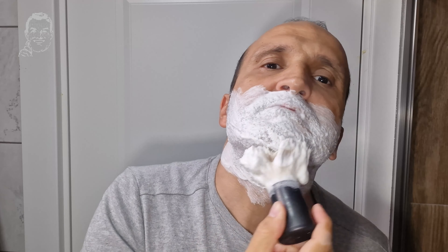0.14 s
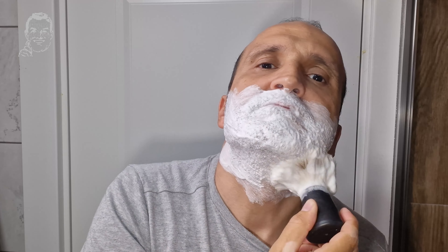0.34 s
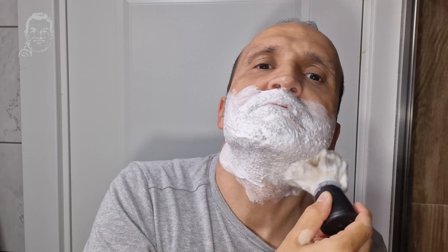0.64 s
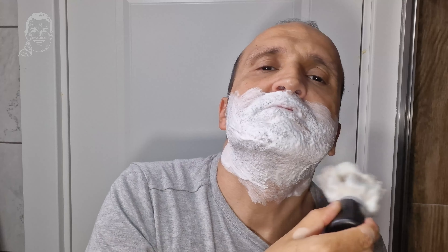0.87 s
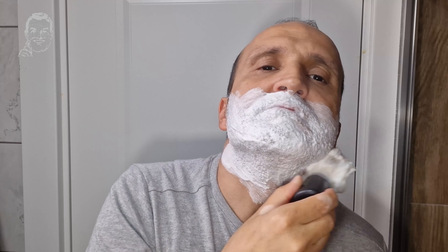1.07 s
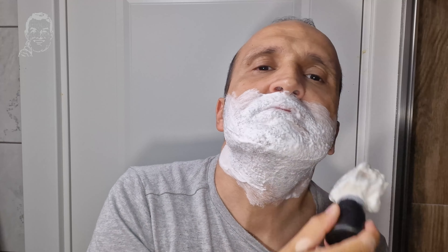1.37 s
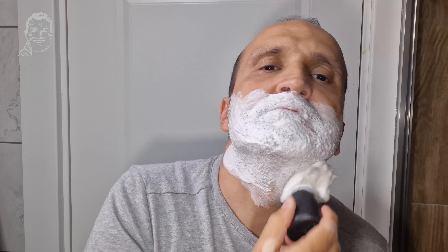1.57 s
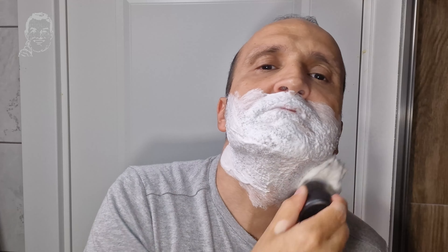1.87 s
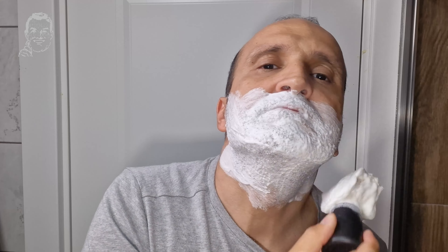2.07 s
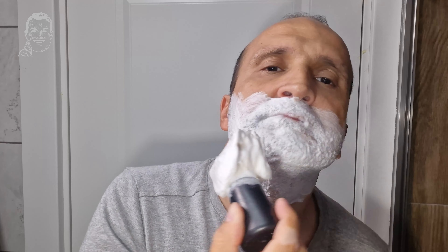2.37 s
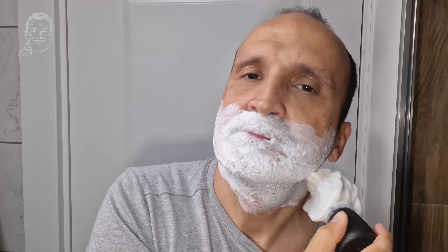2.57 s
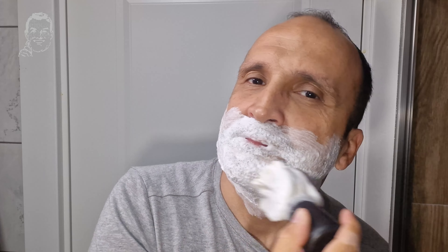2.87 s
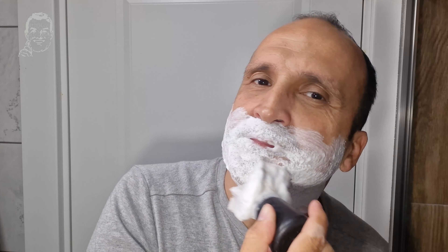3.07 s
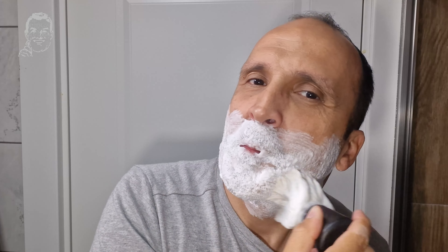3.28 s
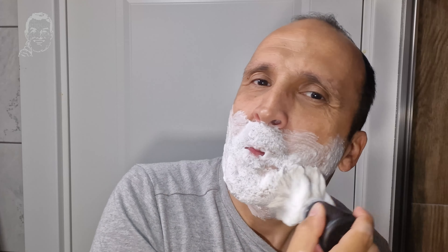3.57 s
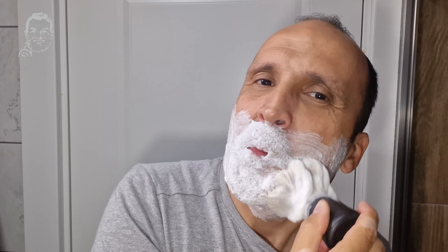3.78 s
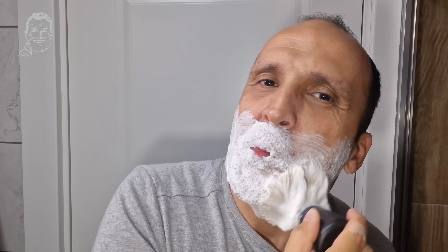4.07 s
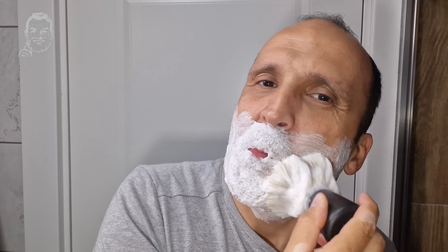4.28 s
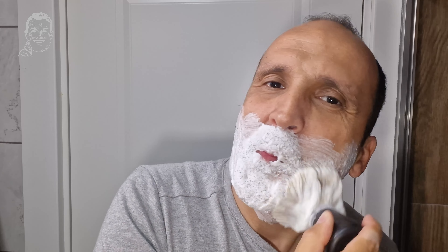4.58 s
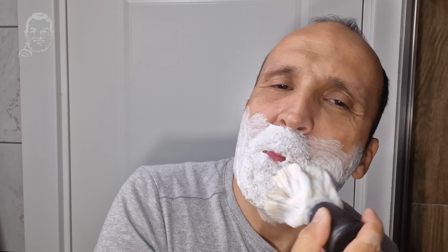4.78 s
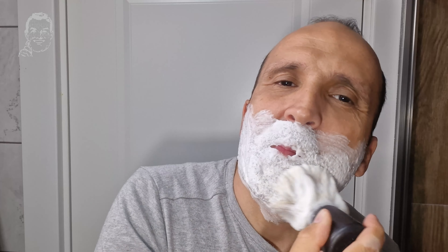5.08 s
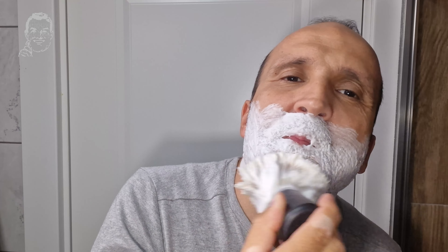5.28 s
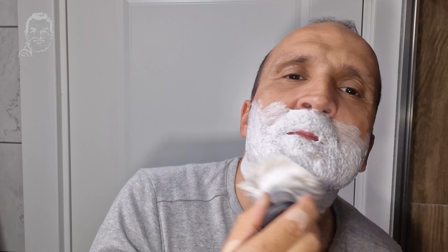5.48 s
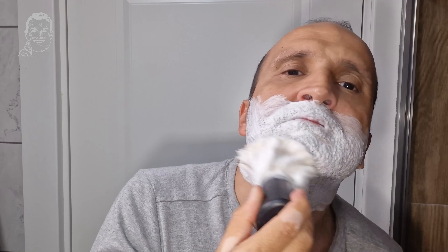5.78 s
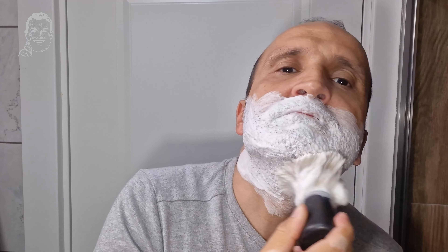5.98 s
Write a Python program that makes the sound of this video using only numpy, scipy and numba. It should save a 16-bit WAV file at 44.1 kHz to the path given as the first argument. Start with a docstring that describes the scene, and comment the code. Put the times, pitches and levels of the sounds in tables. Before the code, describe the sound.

Close up in a small bathroom, a wet shaving brush sweeps hard over a lathered, stubbly face, about seven strokes a second, each a bristly swish with a raspy edge. After one second it nearly stops, leaving faint dabs and soft low plops over quiet hiss. From about 2.4 seconds it sweeps again, a little softer, with fizzing foam, small squelches and popping bubbles until the end.

```python
"""Over a faint room hiss, a wet brush sweeps hard to and fro on a lathered face: bristles flick in dense clicks that
merge into a swish, with shaft rasp, cheek resonance, foam fizz and tip scratch shaped by the same strokes.
Squelches ring as narrow bands in the knot, and single bubbles snap as ticks of a few cycles. From about 1 to 2.4 s
the brush only dabs the neck, with soft plops that ring low and rise; then it sweeps again, more softly, and fizz
comes forward. Early echoes mottle the brush, and narrow resonances and a short tail put it in a small bathroom."""
import sys
import numpy as np
from scipy import signal
from scipy.fft import rfft, irfft
from scipy.io import wavfile
from scipy.ndimage import uniform_filter1d
from numba import njit

SR = 44100
rng = np.random.default_rng(int(sys.argv[2]) if len(sys.argv) > 2 else 0)


def pcm_store(signal):
    """Save signal as 16-bit PCM."""
    levels = np.round(np.clip(np.atleast_2d(signal), -1, 1) * 32767)
    wavfile.write(sys.argv[1], SR, levels.astype(np.int16).T)


N = 270774
T = np.arange(N) / SR  # time of each sample [s]

# colour of the steady room noise: (frequency [Hz], level [dB])
ROOM_COLOUR = [(15, -54), (25, -14), (59, -7), (125, -6.5), (335, -1.5), (811, -1.5), (1060, -4.5),
               (3540, -10), (5880, -7), (7480, -8), (8100, -9.5), (9520, -10.5), (10300, -8), (15000, -8)]
ROOM_DB = -71.5

# strokes of the brush: (fastest moment [s], rise [s], fall [s], swish [dB], then relative to the swish:
# cheek [dB], shaft rasp [dB], foam fizz [dB], tip scratch [dB]; then
# resonance of the wet knot [Hz], lag of foam and tips behind the bristles [s])
BRUSH_STROKES = [(0.06, 0.089, 0.056, -34.5, -11, -8, -9, -7, 3740, 0.00012),
                 (0.203, 0.1, 0.044, -41, -13, -5.5, -11, -15, 3460, 0.018),
                 (0.337, 0.081, 0.062, -33, -12, -6.5, -15.5, -8, 4200, 0.0038),
                 (0.468, 0.055, 0.068, -43.5, -18, -6, -16.0, -19, 3930, -0.00092),
                 (0.59, 0.073, 0.074, -36, -10, -5, -7.5, -13, 4060.0, 0.0075),
                 (0.754, 0.08, 0.059, -49, -20, -8, -13.5, -20, 4630, -0.0013),
                 (0.865, 0.09, 0.047, -42.0, -13.5, -9.5, -7, -26, 4400, 0.001),
                 (0.92, 0.08, 0.039, -44, -15.5, -5, -8, -27, 4600, -0.0027),
                 (1.164, 0.1, 0.16, -63, -14, -12, -14, -15, 4630, -0.002),
                 (1.323, 0.1, 0.052, -67.5, -7.5, -4, -13, -9.0, 3780.0, -0.014),
                 (1.572, 0.022, 0.032, -62.0, -3.5, 0, -19, -6.5, 3830.0, -0.0011),
                 (1.634, 0.097, 0.073, -68, -9.5, -4.5, -9.5, -9.0, 4030, 0.019),
                 (1.724, 0.078, 0.043, -57, -15.5, -7.5, -13.5, -16, 3430, -0.003),
                 (2.03, 0.18, 0.041, -69.5, -14, -8, -13, -8, 4350, -0.016),
                 (2.073, 0.06, 0.034, -56, -16.5, -6.5, -14.5, -17, 3950, 0.003),
                 (2.271, 0.055, 0.15, -74.5, -1.5, -9.5, -18, -6, 4180.0, 0.0081),
                 (2.389, 0.047, 0.028, -47, -15.5, -8, -9.5, -19, 3800, 0.0082),
                 (2.612, 0.057, 0.063, -37, -12.5, -10, -12.5, -11, 3730, -0.0033),
                 (2.859, 0.11, 0.055, -57, -10.5, -10.5, -6, -22, 3400, 0.003),
                 (2.996, 0.061, 0.053, -36, -13.5, -11.5, -3, -21, 3800, -0.0034),
                 (3.114, 0.022, 0.089, -48.5, -16, -10.5, -9, -21.5, 3020.0, 0.025),
                 (3.16, 0.084, 0.043, -52.5, -14.5, -6, -4, -18.0, 4060.0, 0.003),
                 (3.301, 0.066, 0.057, -38, -13.5, -8.5, -1.5, -20, 4100, -0.0033),
                 (3.443, 0.07, 0.042, -50, -14, -7.5, -6.5, -27, 3140.0, 0.011),
                 (3.562, 0.068, 0.071, -39.5, -13.5, -9.5, -3, -19, 4460, -0.00081),
                 (3.69, 0.065, 0.074, -52.5, -18.5, -18.5, -5.5, -22.0, 3760, 0.005),
                 (3.735, 0.049, 0.043, -47.0, -10, -4.5, -8.5, -20.0, 3010.0, -0.0029),
                 (3.855, 0.074, 0.15, -45.5, -11.5, -8, -4, -20.0, 3880, -0.0081),
                 (3.992, 0.068, 0.072, -46, -9.5, -5.5, -2.5, -28, 3260.0, -0.0014),
                 (4.091, 0.037, 0.049, -47, -7.5, -12.5, 3.5, -14.5, 4930, 0.0012),
                 (4.165, 0.14, 0.12, -52.5, -14, -13, -3.5, -28, 4070, -0.00098),
                 (4.248, 0.032, 0.074, -46.5, -9, -1.5, -8.5, -22.0, 3670, 0.0099),
                 (4.359, 0.054, 0.063, -52.5, -6, -12, 4.5, -15, 4730, 0.0053),
                 (4.415, 0.048, 0.054, -63, -19, -8, 2, -22, 4220, 0),
                 (4.473, 0.047, 0.03, -45, -16.5, -22, -4.5, -25, 4050, -0.0083),
                 (4.519, 0.064, 0.053, -49.5, -11.5, -5, -5, -21, 2960, 0.0041),
                 (4.621, 0.051, 0.097, -55.5, -2, -8.5, 7.5, -10, 3990.0, -0.00056),
                 (4.713, 0.049, 0.074, -49.5, -18, -10, -4, -17, 3360, -0.02),
                 (4.783, 0.065, 0.056, -49.5, -10, -6, -7, -20, 3060.0, 0.017),
                 (4.927, 0.083, 0.041, -46.5, -4.5, -10.5, 4, -7, 3520, -0.0068),
                 (5.049, 0.14, 0.077, -52.5, -13, -10.5, -7, -18, 2780.0, 0.0081),
                 (5.188, 0.047, 0.036, -48.5, -10, -8, -4, -15, 3420, -0.0017),
                 (5.269, 0.19, 0.069, -60.5, -10.5, -7.5, -12.0, -12.0, 2790.0, 0.014),
                 (5.32, 0.061, 0.072, -56.5, -9.5, -10, -10, -12, 2960, 0.005),
                 (5.469, 0.072, 0.027, -42, -10.5, -7, -3.5, -10.5, 5170, -0.003),
                 (5.561, 0.1, 0.14, -59, -8, -7.5, -9, -9, 2780, 0.0091),
                 (5.773, 0.099, 0.038, -50.0, -14.5, -11.5, -2, -4.0, 4670, 0.0029),
                 (5.861, 0.087, 0.088, -61.5, -6, -5, -10, -7, 4070, 0.012),
                 (6.05, 0.094, 0.064, -47.5, -12, -11, -5, -5, 5030, 0.00081),
                 (6.093, 0.027, 0.058, -55, -1, -9, -3.5, -19, 4110.0, -0.006)]
ARCH_DB = 21.5  # drop of each stroke's rounded arch after its rise or fall time
ARCH_POWER, ARCH_FOOT = 2.473, 4  # higher: a flatter top; a foot that ends sooner
KNOT_SAG_PER_S = 0.56  # the knot's resonance sinks through a stroke as the bristles splay
REST_DB = -86  # the brush merely lying in the lather

# colours of the flicks, shaft rasp, skin, foam and tips: (frequency [Hz], level [dB])
SWISH_COLOUR = [(600, -56), (1300, -34), (2100, -2.5), (2700, -1.5), (3700, 0.5), (4600, 1.5), (5000, -1),
                (5400, -9), (6200, -10.5), (6800, -22), (9000, -35), (15000, -55)]
SHAFT_COLOUR = [(100, -67.5), (600, -33.5), (1150, -16.5), (1480, -4.5), (1800, -0.5), (2150, -1.5),
                (2600, -5), (3500, -33.5), (8000, -49.5)]
CHEEK_COLOUR = [(50, -49), (130, -55), (250, -30), (340, -20), (420, -10), (520, -1.5), (680, 4.5),
                (790, -2), (1000, 4), (1300, 2.5), (1700, 0.5), (3000, -50)]
FIZZ_COLOUR = [(300, -59), (5000, -27), (5700, -8.5), (6200, 6), (6800, 0.5), (7400, 3.5), (8000, 7),
               (8600, 4.5), (9400, 0.5), (10400, -2.5), (12000, -12), (15000, -23.5)]
TIP_COLOUR = [(300, -62), (3000, -37.5), (5400, -3.5), (6200, 0.5), (7500, -1.5), (9500, 0.5), (11000, -6),
              (12600, -4), (13700, -14.5), (15500, -19)]

# cheek resonance, set by where the brush lies over the hollow of the mouth: (time [s], frequency [Hz])
CHEEK_HOLLOW = [(0, 945), (.2, 900), (.58, 1075), (.9, 910), (2.0, 776), (2.39, 1170), (2.56, 710),
                (2.66, 864), (2.95, 1076), (3.45, 890), (3.75, 997), (4.5, 972), (4.95, 1060), (5.19, 736),
                (5.45, 1180), (5.75, 1040), (6.14, 740)]
# foam resonance, dipping to about 6.4 kHz in the last strokes before the neck dabs: (time [s], frequency [Hz])
FOAM_PITCH = [(0, 8100), (.24, 8100), (.406, 7300), (.548, 7360), (.676, 6400), (.912, 6370), (1.28, 8050),
              (4.7, 8080), (5.25, 7860), (5.75, 8470)]
FOAM_WANDER = 0.011  # share by which the foam resonance drifts

# squeezed knot ringing in a narrow band: (middle [s], spread of the swell [s], pitch at the middle [Hz],
# level before the swell [dB])
KNOT_SQUELCHES = [(0.197, 0.02, 1780, -48), (1.397, 0.045, 1400, -76.5), (2.066, 0.02, 644, -71.5),
                  (2.592, 0.017, 644, -50), (2.627, 0.02, 800, -55.5), (2.613, 0.0071, 1490, -46),
                  (2.831, 0.03, 3660, -58), (2.996, 0.032, 1185, -52.5), (4.22, .03, 3940, -52.5),
                  (4.41, .025, 4220, -56.5), (4.493, 0.01, 2950, -50), (4.504, 0.014, 1830, -61),
                  (4.665, 0.035, 4000, -56), (3.303, .025, 432, -74), (4.929, 0.015, 394, -66),
                  (5.033, 0.017, 2540, -53), (5.28, 0.052, 2780, -62), (5.324, 0.0091, 4700, -52),
                  (5.462, 0.026, 422, -69), (5.551, 0.037, 2920, -58.5), (6.049, 0.02, 4330, -44.5),
                  (6.084, 0.012, 700, -59)]
# bursting bubbles: (time [s], level before trim and filter [dB], pitch [Hz])
BUBBLE_BURSTS = [(0.2485, -32, 4000), (0.3393, -16.5, 4600), (.506, -47, 4630), (0.9189, -29, 4730),
                 (1.025, -44.5, 6860), (1.1403, -34, 4200), (1.157, -44, 4080), (1.186, -45, 4560),
                 (1.569, -53, 2980), (1.905, -53, 2000), (3.1015, -30.5, 3540), (3.424, -28, 3300),
                 (3.507, -31.5, 3500), (3.679, -33.5, 3680), (3.720, -33, 3260), (3.925, -30, 3540),
                 (3.960, -26, 3800), (3.9799, -21.5, 3000), (4.238, -28, 3560), (4.266, -32, 2950),
                 (4.476, -26.5, 3150), (4.706, -34, 4380), (5.027, -32.5, 2880), (5.048, -28, 3570),
                 (5.217, -37, 2780), (5.269, -48, 3000), (5.554, -51, 2920), (5.844, -41, 4340)]
# the wet knot lands on the neck: (time [s], peak [dB], starting pitch [Hz])
KNOT_PLOPS = [(1.567, -61, 490), (1.9027, -53, 424), (1.917, -53.5, 530), (1.924, -57, 408),
              (2.25, -59.5, 680), (2.261, -58, 487), (2.272, -61, 395)]
# narrow resonances of the face and the corner it is in: (frequency [Hz], width [Hz], level [dB])
NOOK_RESONANCES = [(390, 22, 2), (680.7, 11, 4.5), (799, 30, 3.5), (880, 34, -1.5), (1020, 19, -4),
                   (1136, 27, -2), (1301, 31, -5.5), (1425, 150, -6), (1650, 16, -2.5), (1785, 14, 0.5),
                   (1943, 36, -17.5), (2756, 130, -11.5), (3940, 7.6, -32), (4490, 45, -2.5)]


def undb(db):
    """Decibels to gain."""
    return 10 ** (np.asarray(db) / 20)


def unit(x):
    """Scale to rms 1."""
    return x / np.sqrt(np.mean(x ** 2))


def curve(rows):
    """Glide in straight lines through (time [s], value) points, one value per sample."""
    s, values = np.transpose(rows)
    return np.interp(T, s, values)


def add(out, s, sound):
    """Mix a short sound in at time s."""
    i = int(s * SR)
    out[i:i + len(sound)] += sound[:N - i]


def colour(x, points, size=2048):
    """Give a sound the spectrum (frequency [Hz], level [dB]) with a causal filter; the result has rms 1."""
    hz, db = np.transpose(points)
    bins = np.maximum(np.arange(size // 2 + 1) * SR / size, 1)
    gain = undb(np.interp(np.log(bins), np.log(hz), db))
    # folding the cepstrum forward makes the filter minimum phase
    cepstrum = irfft(np.log(gain))
    cepstrum[1:size // 2] *= 2
    cepstrum[size // 2 + 1:] = 0
    impulse = irfft(np.exp(rfft(cepstrum)))
    return unit(signal.fftconvolve(x, impulse)[:N])


@njit
def resonate(x, hz, width):
    """Band-pass with a moving centre, gain 1 there."""
    y, band, low = np.empty(len(x)), 0., 0.
    for i in range(len(x)):
        g, damping = np.tan(np.pi * hz[i] / SR), width / hz[i]
        v = (band + g * (x[i] - low)) / (1 + g * (g + damping))
        band, low, y[i] = 2 * v - band, low + 2 * g * v, damping * v
    return y


def ringing(x, hz, width, direct):
    """A moving resonance plus a direct share of the sound; rms 1."""
    return unit(direct * x + resonate(x, hz, width))


def walk(rate):
    """Smooth chance with rms 1, changing rate times a second."""
    k = int(SR / rate)
    steps = np.repeat(rng.standard_normal(N // k + 1), k)
    return unit(uniform_filter1d(steps, k)[:N])


def clicks(per_s, spread_db):
    """Random clicks of uneven size and either sign, with the same power at any density."""
    chance = np.clip(per_s / SR, 1e-3, 1)
    size = undb(spread_db * np.minimum(rng.exponential(size=N), 6))
    sign = np.sign(rng.standard_normal(N))
    return unit((rng.random(N) < chance) * sign * size / np.sqrt(chance))


def room_hiss():
    """The steady faint noise of the room and the microphone."""
    return undb(ROOM_DB) * colour(rng.standard_normal(N), ROOM_COLOUR, size=8192)


def arch(age, rise, fall):
    """Power of one stroke, 1 at its fastest moment: a broad top, steep flanks and a lingering foot."""
    u = np.abs(age) / np.where(age < 0, rise, fall)
    flank = undb(ARCH_DB) ** (2 / ARCH_FOOT) - 1
    return (1 + flank * u ** ARCH_POWER) ** -ARCH_FOOT


def strokes(tips_lead_s=0.0057, tips_length=0.96):
    """Overlapping strokes add in power: dB of the swish, dB of the four other layers above it, and the knot's Hz."""
    power = np.full((5, N), undb(REST_DB) ** 2)
    knot = power[0] * np.mean([row[8] for row in BRUSH_STROKES])
    for s, rise, fall, db, cheek_db, shafts_db, fizz_db, tips_db, knot_hz, lag in BRUSH_STROKES:
        span = slice(max(int((s - 3 * rise) * SR), 0), int((s + 3 * fall) * SR))
        age = T[span] - s
        bristles, foam = arch(age, rise, fall), arch(age - lag, rise, fall)
        # the tips lead the foam and scratch a little more briefly, before the bristles bend over
        tips = arch(age - lag + tips_lead_s, tips_length * rise, tips_length * fall)
        peaks = undb(db + np.array([0, cheek_db, shafts_db, fizz_db, tips_db])) ** 2
        power[:, span] += peaks[:, None] * np.array([bristles, bristles, bristles, foam, tips])
        # the louder stroke has more say in the knot's pitch
        knot[span] += peaks[0] * bristles * knot_hz * np.exp(-KNOT_SAG_PER_S * age)
    levels = 10 * np.log10(power)
    return levels[0], levels[1:] - levels[0], knot / power[0]


def brush():
    """Bristles flick off the stubble: the harder the stroke, the more of them, until they merge into a swish."""
    swish_db, (cheek_db, shafts_db, fizz_db, tips_db), knot_hz = strokes()
    cheek_hz = curve(CHEEK_HOLLOW)
    foam_hz = curve(FOAM_PITCH) * (1 + FOAM_WANDER * walk(14))
    per_s = 14000 * undb(.55 * (swish_db + 44.5))
    # among the flicks small bubbles keep popping, with a smaller share in hard strokes
    pops = undb(-10) * clicks(170, spread_db=2.8)
    pops_share = np.minimum(undb(-.5 * (swish_db + 48.0)), 1)
    flicks = clicks(per_s, spread_db=3.0) + pops * pops_share
    # air spaces in the wet knot give a broad resonance that shifts as it is squeezed
    swish = ringing(colour(flicks, SWISH_COLOUR), knot_hz, width=1410.0, direct=0.82)
    # splayed bristles rub with their shafts, which rasp lower than the ends
    shafts = undb(shafts_db) * colour(flicks, SHAFT_COLOUR)
    # the rubbing shakes the skin over the hollow of the mouth
    skin = colour(.5 * flicks + 0.47 * clicks(per_s, spread_db=2.5), CHEEK_COLOUR)
    cheek = undb(cheek_db) * ringing(skin, cheek_hz, width=110.0, direct=0.67)
    # tiny foam cells break, more densely in hard strokes
    cells = resonate(colour(clicks(per_s, spread_db=3.5), FIZZ_COLOUR), foam_hz, 2100.0)
    fizz = undb(fizz_db) * ringing(cells, foam_hz, width=2400.0, direct=0.6)
    # the tips scratch through the lather
    tips = undb(tips_db) * colour(clicks(per_s, spread_db=-1.5), TIP_COLOUR)
    # bristles catch and let go in tufts, so the whole sound flutters
    tufts_db = 0.93 * walk(130) + 0.39 * walk(40)
    return undb(swish_db + tufts_db) * (swish + shafts + cheek + fizz + tips)


def scatter(x, echo_db=-21.5, count=10):
    """Hand, jaw and shoulder throw back faint early echoes that change as they move, mottling the colour."""
    lags = rng.integers(SR // 1000, SR // 200, count)  # 1 to 5 ms
    echoes = sum(walk(9) * np.pad(x, (lag, 0))[:N] for lag in lags)
    gain = undb(echo_db)
    return (x + gain * echoes) / np.sqrt(1 + count * gain ** 2)


def squelches(width_hz=170.0, width_share=0.064, sag=0.017):
    """A pocket of air in the wet knot rings with the rubbing, higher ones more broadly; its pitch sags as it opens."""
    out, rub = np.zeros(N), clicks(4000, spread_db=2.5)
    for s, spread, hz, db in KNOT_SQUELCHES:
        span = np.abs(T - s) < 2.5 * spread
        u = (T[span] - s) / spread
        pitch, width = hz * (1 - sag * u), width_hz + width_share * hz
        ring = resonate(resonate(rub[span], pitch, width), pitch, width)
        swell = np.exp(-u ** 2 / 2)
        out[span] += undb(db) * swell * unit(ring)
    return out


def bubbles(gain_db=-2.5, skin_db=-18, skin_hz=1100):
    """A film of lather snaps: a tick of a few cycles, with a duller tap on the skin beneath."""
    out, t = np.zeros(N), T[:SR // 100]

    def tick(hz):
        """A few cycles that swell and die, peak 1."""
        age = 2 * hz * t  # in half cycles
        wave = np.sin(np.pi * age) * age ** 2 * np.exp(-age)
        return wave / np.abs(wave).max()

    for s, db, hz in BUBBLE_BURSTS:
        snap = tick(hz) + undb(skin_db) * tick(skin_hz)
        add(out, s, undb(db + gain_db) * snap)
    return signal.sosfilt(signal.butter(3, [550, 6300], "band", fs=SR, output="sos"), out)


def plops(t60=0.015, glide=4.3):
    """Air trapped under the wet knot gives a short low ring that rises a little."""
    out, t = np.zeros(N), T[:SR // 16]
    envelope = undb(-60 * t / t60) * (1 - np.exp(-t / 0.0025))  # soft onset over a few ms
    for s, db, hz in KNOT_PLOPS:
        ring = np.sin(2 * np.pi * hz * t * (1 + glide * t)) * envelope
        add(out, s, undb(db) * ring / np.abs(ring).max())
    return out


def bathroom(x, t60=0.076, wet_db=-15):
    """A few narrow resonances and a short, dense tail from the near walls."""
    nook = sum(undb(db) * resonate(x, np.full(N, float(hz)), float(width)) for hz, width, db in NOOK_RESONANCES)
    near = x + nook
    t = T[:SR // 2]
    tail = rng.standard_normal(len(t)) * undb(-60 * t / t60) * (t > .003)  # starts after 3 ms
    tail = signal.sosfilt(signal.butter(1, 6000, fs=SR, output="sos"), tail / np.linalg.norm(tail))
    return near + undb(wet_db) * signal.fftconvolve(near, tail)[:N]


def scene():
    """Brush, squelches, bubbles and dabs in the bathroom, over the hiss."""
    shave = scatter(brush()) + squelches() + bubbles() + plops()
    return (bathroom(shave) + room_hiss())[None]


def record(dry, top_hz=15500):
    """The recorder thins the deep bass and cuts the top."""
    thin = signal.sosfilt(signal.butter(2, 50, "high", fs=SR, output="sos"), dry)
    return signal.sosfilt(signal.ellip(10, .2, 70, top_hz, fs=SR, output="sos"), thin)


dry = scene()
out = record(dry)
pcm_store(out)
```